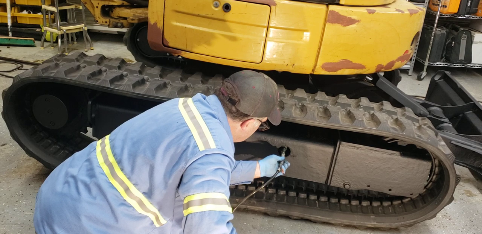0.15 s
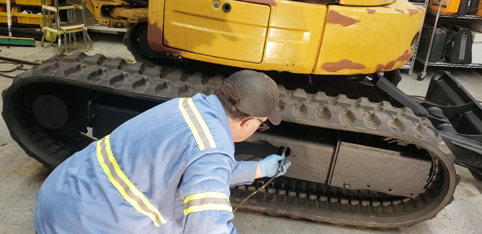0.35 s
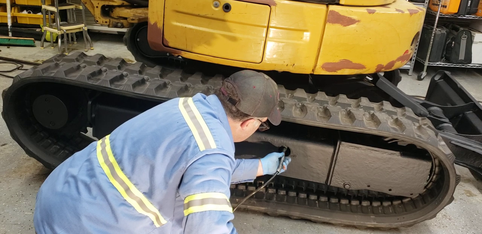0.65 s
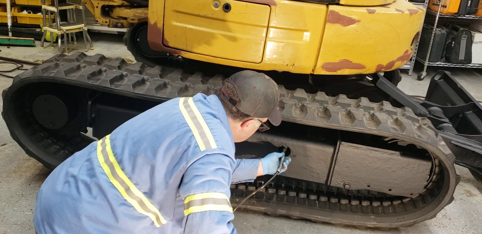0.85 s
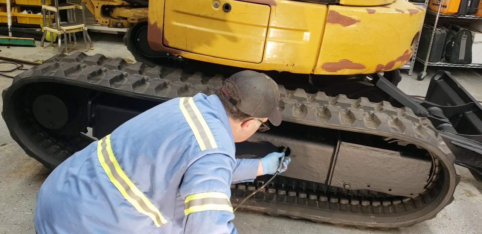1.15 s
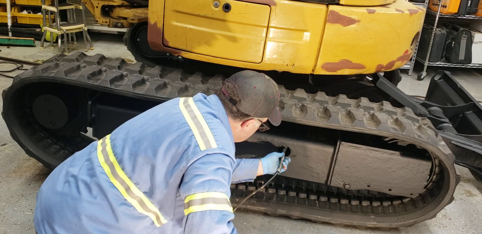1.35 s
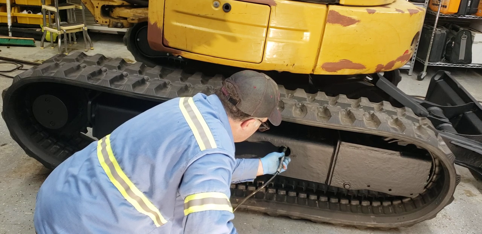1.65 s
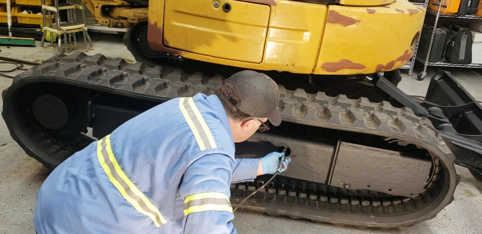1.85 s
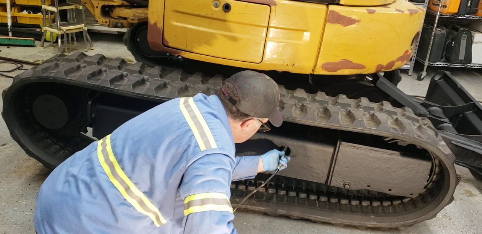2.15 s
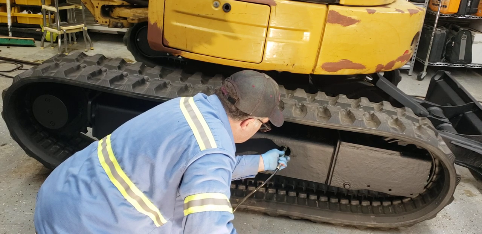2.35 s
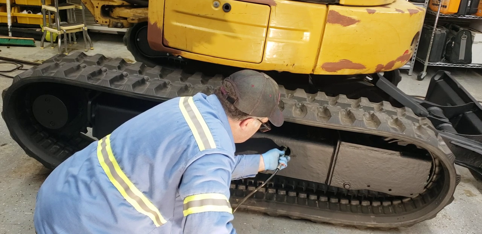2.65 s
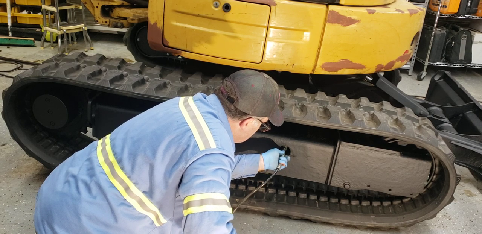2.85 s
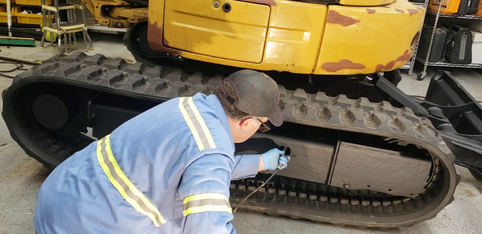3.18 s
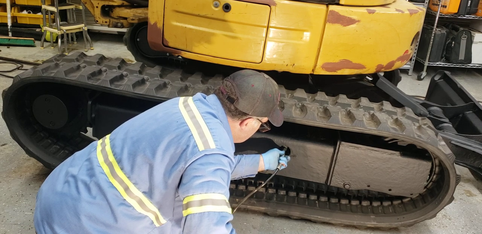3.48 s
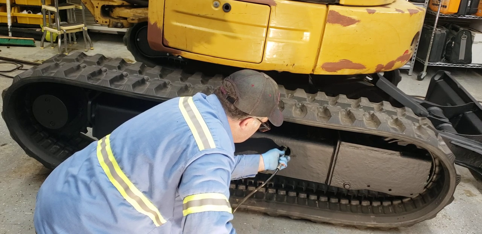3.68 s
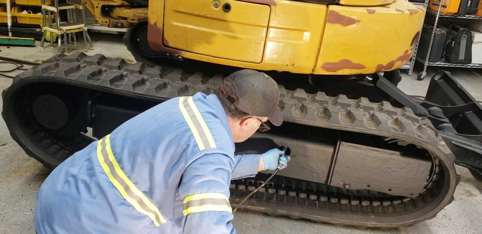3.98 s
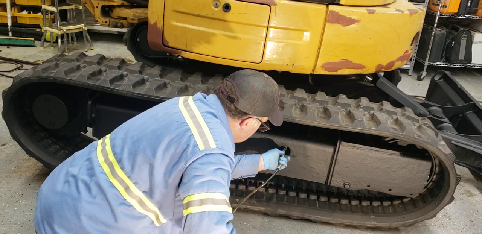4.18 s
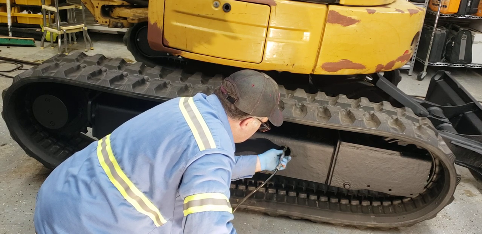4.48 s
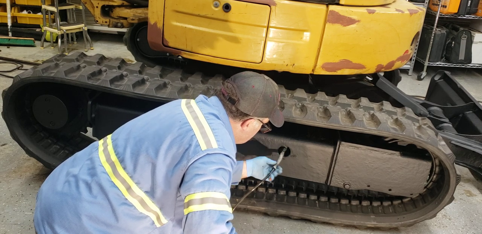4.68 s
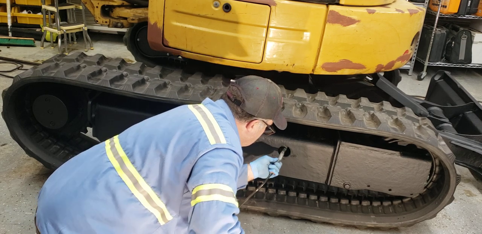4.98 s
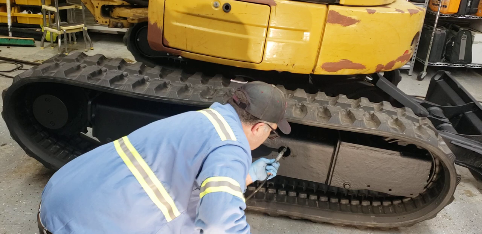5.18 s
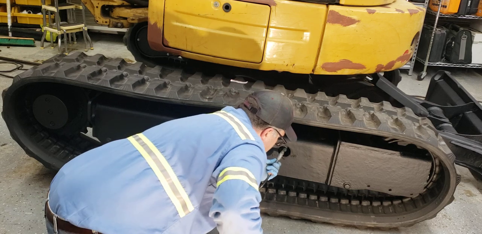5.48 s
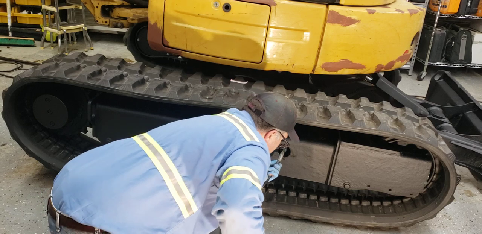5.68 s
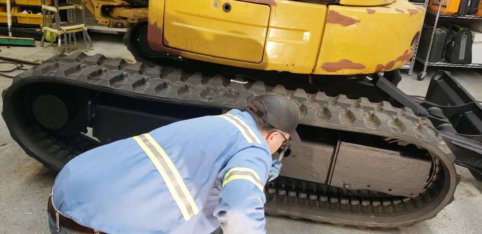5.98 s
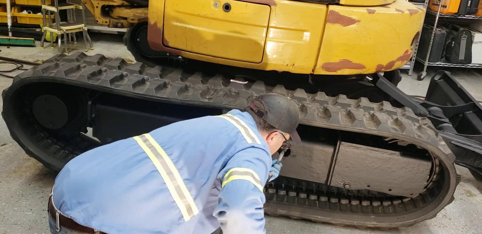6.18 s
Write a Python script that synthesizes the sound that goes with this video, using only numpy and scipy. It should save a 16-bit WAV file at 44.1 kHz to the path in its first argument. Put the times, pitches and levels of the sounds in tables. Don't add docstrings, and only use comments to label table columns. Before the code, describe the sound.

A battery grease gun motor whines steadily in a large workshop, its pitch dipping and recovering about twice a second with faint thumps and gritty gear noise.

```python
import sys
import numpy as np
from scipy import signal
from scipy.fft import rfft, irfft, next_fast_len
from scipy.io import wavfile
from scipy.ndimage import uniform_filter1d, map_coordinates

SR = 44100
rng = np.random.default_rng(int(sys.argv[2]) if len(sys.argv) > 2 else 0)


def invert_db(x):
    u = np.asarray(x, float) / 20
    return 10 ** u


def output_pcm(signal):
    pcm = np.clip(np.atleast_2d(signal).T, -1, 1) * 32767
    wavfile.write(sys.argv[1], SR, np.round(pcm).astype(np.int16))


N = 279594
LEAD = SR * 3 // 4
M = N + LEAD
FIRST_S, CRANK_S = -.333, .5553

# (effort [0-1], lateness [s], valve thump [dB], hose groan [dB], groan length [s])
PLUNGER_STROKES = [(1, 0, -52, -64, .3), (1, 0, -49, -61, .33), (1, 0, -44, -57, .22),
                   (1, -.003, -48, -63, .35), (.95, 0, -53, -58, .62), (1, -.002, -48, -60, .2),
                   (.65, .008, -59, -60, .33), (.88, .004, -54, -65, .3), (.8, .01, -54, -67, .2),
                   (.95, -.002, -51, -68, .2), (.75, -.01, -55, -54.5, .2), (.67, -.004, -51, -59, .3),
                   (.88, .004, -50, -62, .3)]
# (frequency [Hz], density [dB per Hz])
WHIR_SPECTRUM = [(150, -33), (330, -22.5), (700, -17.5), (1020, -17), (1150, -8), (2000, -8), (3600, -5),
                 (4400, -4), (4700, -10), (5800, -6.5), (7200, -9), (8700, -16.5), (10500, -16),
                 (15800, -18)]


def along(points, hz):
    f, v = np.transpose(points)
    return np.interp(np.log(hz + 1), np.log(f + 1), v)


def unit(x):
    return x / np.sqrt(np.mean(x ** 2) + 1e-20)


def wobble(rate):
    coarse = np.arange(0, M + 32, 32)
    knots = rng.standard_normal(int(M * rate / SR) + 4)
    return np.interp(np.arange(M), coarse, map_coordinates(knots, [coarse * rate / SR]))


def filtered(x, response):
    m = next_fast_len(x.shape[-1] + 8192)
    spectrum = rfft(x, m) * response(np.fft.rfftfreq(m, 1 / SR))
    return irfft(spectrum, m)[..., :x.shape[-1]]


def noise(spectrum, channels=1):
    white = rng.standard_normal((channels, M))
    return unit(filtered(white, lambda hz: invert_db(along(spectrum, hz))))


def paired(two):
    # (frequency [Hz], left-right correlation [-1 to 1])
    likeness = [(60, 0.7), (180, 0.8), (550, 0.1), (1650, 0.05), (4970, -0.05), (15000, 0)]

    def mid_and_side(hz):
        angle = np.arccos(np.clip(along(likeness, hz), -1, 1)) / 2
        return np.array([np.cos(angle), np.sin(angle)])

    mid, side = filtered(two, mid_and_side)
    return np.array([mid + side, mid - side])


def shop(rumble_db):
    # (frequency [Hz], density [dB per Hz])
    rumble = [(12, -55), (20, -10), (119, 1), (177, -3), (227, 4), (315, -3), (330, -28), (430, 10.5),
              (730, -120)]
    # (frequency [Hz], level [dB rms])
    lamps = [(119, -75.5), (241, -73)]
    t = np.arange(M) / SR
    hum = np.zeros(M)
    for hz, db in lamps:
        swell = invert_db(db + 1.5 + 3.5 * wobble(7))
        hum += swell * np.sin(2 * np.pi * hz * t + 0.96 * wobble(8.8))
    return hum + invert_db(rumble_db) * paired(noise(rumble, channels=2))


def hall():
    # (frequency [Hz], t60 [s])
    decay = [(150, 1), (1000, 0.27), (4000, 0.52), (12000, 0.05)]
    hz, t, z = signal.stft(rng.standard_normal((2, SR)), SR, nperseg=256)
    fading = z * invert_db(-60 * t / along(decay, hz)[:, None])
    tail = paired(signal.istft(fading, SR, nperseg=256)[1])
    bins = np.fft.rfftfreq(len(tail[0]), 1 / SR)
    each = np.sqrt(along(decay, 1000) / along(decay, bins))
    tail = irfft(rfft(tail) * each, len(tail[0]))
    return np.pad(tail / np.linalg.norm(tail[0]), ((0, 0), (300, 0)))


def heard(x, direct_db, hall_db, tail):
    # (frequency [Hz], direct sound [dB])
    screen = [(300, 12.5), (1200, -9.5), (2000, 7), (4500, -3), (13000, -3.5)]
    wall_s, wall_db = .092, [[-4], [-8]]
    wall_hz = 2500

    def path(hz):
        slap = invert_db(wall_db) * np.exp(-2j * np.pi * hz * wall_s) / (1 + (wall_hz / (hz + 1)) ** 4)
        arrival = np.exp(np.outer([-1, 1], 1.03 * 2j * np.pi * hz / SR))
        return invert_db(along(screen, hz)) * (1 + slap) * arrival

    reverb = signal.fftconvolve(x, tail, axes=1)[:, :M]
    return invert_db(direct_db) * filtered(x, path) + invert_db(hall_db) * reverb


def hose():
    t = (np.arange(M) - LEAD) / SR
    swell = np.zeros(M)
    for k, (*_, db, length_s) in enumerate(PLUNGER_STROKES):
        since = t - FIRST_S - k * CRANK_S + .09
        swell += invert_db(db) * np.sin(np.pi * np.clip(since / length_s, 0, 1))
    return invert_db(-1 + 1.3 * wobble(12)) * swell * np.sin(2 * np.pi * 239.6 * t + 0.67 * wobble(14))


def valve(hz, t60):
    out = np.zeros(M + SR)
    t = np.arange(SR // 10) / SR
    for k, (_, _, db, *_) in enumerate(PLUNGER_STROKES):
        puff = .3 * invert_db(-60 * t / .012) * uniform_filter1d(rng.standard_normal(len(t)), 20)
        thump = invert_db(-60 * t / t60) * np.sin(2 * np.pi * hz * t)
        start = LEAD + round((FIRST_S + k * CRANK_S - .09) * SR)
        out[start:][:len(t)] += invert_db(db) * (thump + puff)
    return out[:M]


def plunger():
    drag_hz, sink_s, rebound_s = 16.8, .102, .095
    dwell_s = .005
    creep_hz, creep_s = 6.6, .37
    bite_s = .11
    attack_s, hold_s, release_s = .036, .055, .17
    t = (np.arange(M) - LEAD) / SR
    lost_hz, load = np.zeros(M), np.zeros(M)
    ease = lambda u: np.sin(np.pi / 2 * np.clip(u, 0, 1)) ** 2
    for k, (effort, late_s, *_) in enumerate(PLUNGER_STROKES):
        s = (t - FIRST_S - k * CRANK_S - late_s) * effort ** .35
        sink = ease(1 + (s + dwell_s) / sink_s)
        rebound = drag_hz * ease(1 - (s - dwell_s) / rebound_s)
        creep = creep_hz * np.clip(1 - s / creep_s, 0, 1)
        lost_hz += effort * sink * (rebound + creep)
        bite = s + bite_s
        load += effort * ease(bite / attack_s) * ease(1 - (bite - attack_s - hold_s) / release_s)
    return lost_hz, load


def gears(turns, load, whir_db, grind_db, beat, sway_db):
    # (frequency [Hz], density [dB per Hz])
    grind = [(100, -27), (190, -31), (240, -22), (290, -15.5), (520, -9), (900, -7.5), (1500, -7.5),
             (2200, -12), (3500, 4), (5000, -9.5), (8000, -10.5), (12000, -12), (15800, -12)]
    pulse = 1 + beat * np.cos(2 * np.pi * turns)
    whir = invert_db(whir_db + sway_db * wobble(6)) * pulse * noise(WHIR_SPECTRUM)
    return whir + invert_db(grind_db + 1.7 * wobble(30)) * load * noise(grind)


def whine(turns, lost_hz, flutter_db, jitter, fray):
    # (multiple of shaft speed, level [dB], left-right [dB], gain at the slowest moment [dB])
    orders = [(1, -69, 4, 0), (2, -59, -1, -1), (3, -46.5, 0, -4), (3.35, -59, -2, 0), (5, -60, -2, -1),
              (6, -57.5, -2, -1), (7, -60, -4, -1), (8, -53, -4, -2), (9, -49, -2, -3), (9.26, -56, 0, 3),
              (10.28, -52, -6, 6), (10.98, -56, -5, 4), (12, -43, -6, 10), (13, -56, -2, -3),
              (15, -57, -3, -3), (16, -53, -9, -3), (18, -54, -6, -3), (21, -59, 0, -3), (24, -58, -3, -3),
              (25, -59, -1, -4), (33, -60, 2, -3), (36, -51, 0, -4), (37, -66, -2, -3), (42, -68, -3, -3)]
    # (frequency
    # [Hz], width [Hz], left [dB], right [dB], left lead [rad])
    resonances = [(353, 14, -4, 4, .3), (366.3, 5, 2, -3, .5), (730, 6, -9, 2, 0), (737, 5, 2, -20, 0),
                  (1101, 9, -20, 9, 0), (1103, 15, 8, -20, 0), (3240, 30, 2, -9, 0), (3270, 20, -3, 2, 0),
                  (3308, 20, 2, 5, 4), (3750, 25, -20, 6, 0), (3788, 16, 4, 6, -1.3), (5845, 45, -20, 1, 0),
                  (4150, 70, -20, -8, 0), (4320, 40, 2, -20, 0), (4362, 30, -20, 8, 0), (4405, 8, -20, 9, 0),
                (4418, 15, 16, -20, 2.8), (4420, 9, -20, 6, 0), (8790, 60, 3, 4, 2.5),
                (9195, 60, 5, 4, 3.5), (13110, 120, 7, -3, .9)]
    out = np.zeros((2, M))
    sag = np.sqrt(np.abs(lost_hz) / 23)
    for k, db, pan_db, sag_db in orders:
        flutter = flutter_db * np.log(1 + k) * (wobble(5.4) + (1 + sag ** 2) * wobble(45))
        size = invert_db(db + 1 + sag_db * sag + flutter)
        shake = jitter * np.sqrt(k) * (1 + fray * sag ** 2) * wobble(70)
        tone = size * np.sin(2 * np.pi * (k * turns + rng.random()) + shake)
        out += invert_db([[pan_db / 2], [-pan_db / 2]]) * tone

    def shell(f):
        total = 1
        for c, w, left_db, right_db, lead in resonances:
            sides = invert_db([[left_db], [right_db]]) * np.exp([[1j * lead], [0]])
            total = total + sides * 1j * f * w / (c * c - f * f + 1j * f * w)
        return total

    return filtered(out, shell)


def scene():
    # (time [s], speed [Hz])
    shaft = [(0, 368.5), (3, 368.2), (4.5, 368.6), (6.3, 369.2)]
    # (frequency [Hz], left-right [dB])
    lean = [(60, -5), (300, 1), (500, -1.5), (900, -3), (1400, -5), (3000, -2.5), (4700, -5), (5800, -6.5),
            (7000, -5.5), (7800, -4.5), (9300, 1.5), (10500, -1.5), (12500, 3), (15000, -6)]
    lost_hz, load = plunger()
    free_hz = np.interp((np.arange(M) - LEAD) / SR, *np.transpose(shaft))
    turns = np.cumsum(free_hz - lost_hz + 0.15 * wobble(12)) / SR
    tail = hall()
    tones = heard(whine(turns, lost_hz, flutter_db=.3, jitter=.025, fray=3), -2, -17, tail)
    rough = gears(turns, load, whir_db=-33.5, grind_db=-34, beat=0.06, sway_db=1.14)
    rough = heard(rough + valve(120, t60=0.046), -9.5, -2.4, tail)
    rough = rough + invert_db(-39) * paired(noise(WHIR_SPECTRUM, channels=2))

    def shade(hz):
        low_cut = 1 + (95 / (hz + 1)) ** 3
        return invert_db(np.outer([.5, -.5], along(lean, hz))) / low_cut

    return (tones + filtered(rough, shade) + hose() + shop(rumble_db=-66.5))[:, LEAD:]


def low_pass(x):
    return signal.sosfilt(signal.butter(12, 17070, fs=SR, output="sos"), x)


def record(dry):
    mix = filtered(dry, lambda hz: hz < 15730)
    return low_pass(mix)


dry = scene()
out = record(dry)
output_pcm(out)
```